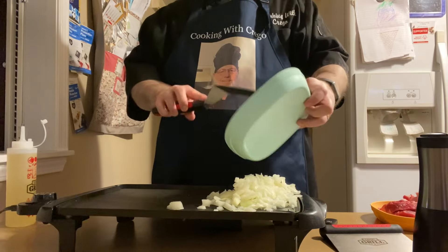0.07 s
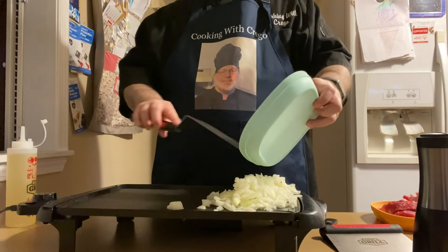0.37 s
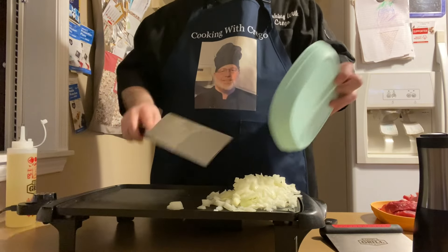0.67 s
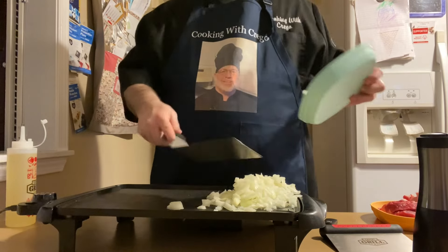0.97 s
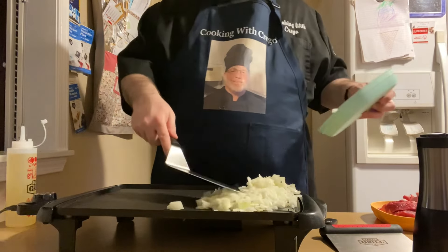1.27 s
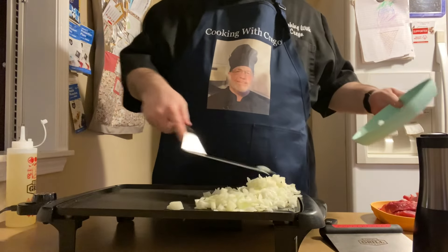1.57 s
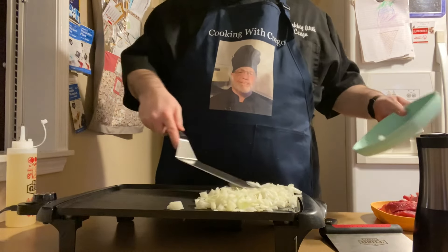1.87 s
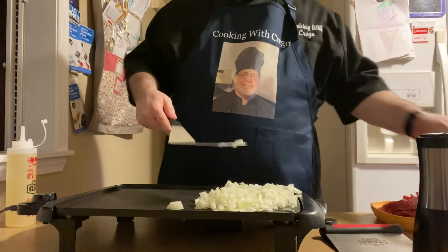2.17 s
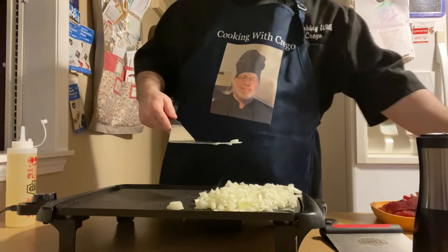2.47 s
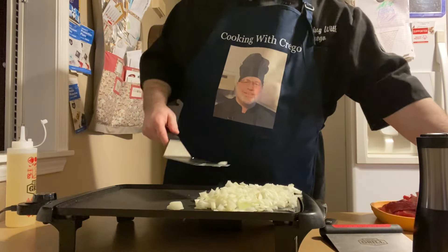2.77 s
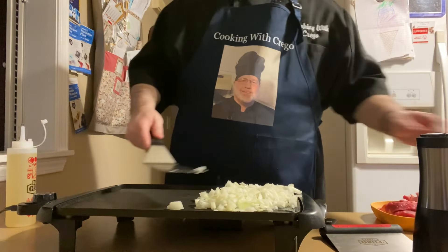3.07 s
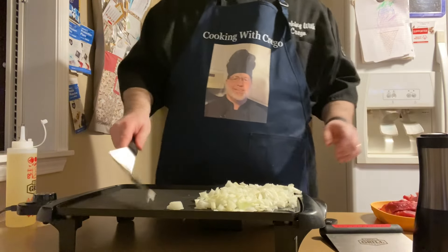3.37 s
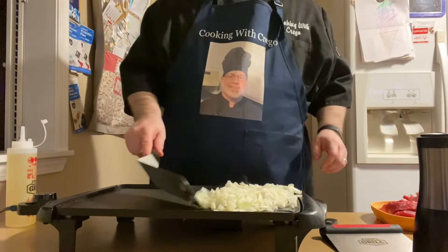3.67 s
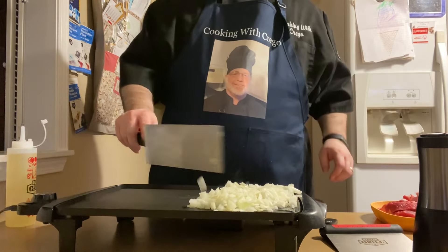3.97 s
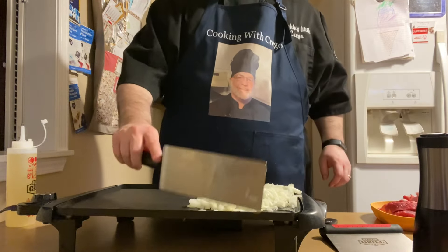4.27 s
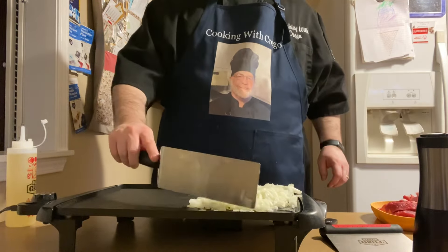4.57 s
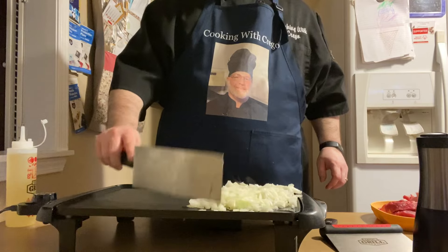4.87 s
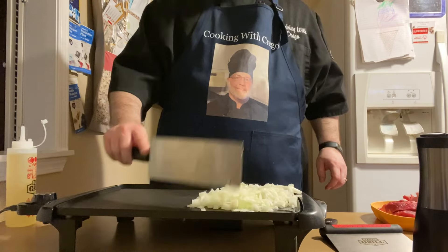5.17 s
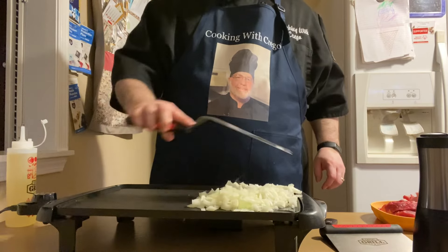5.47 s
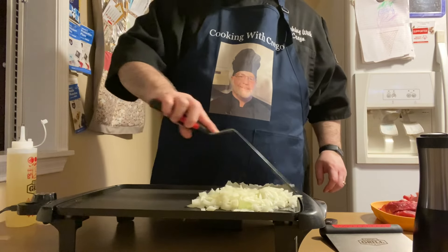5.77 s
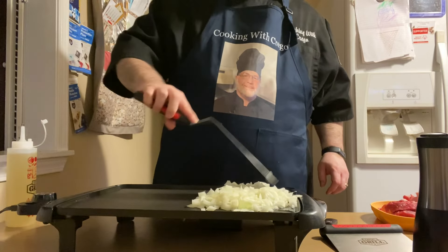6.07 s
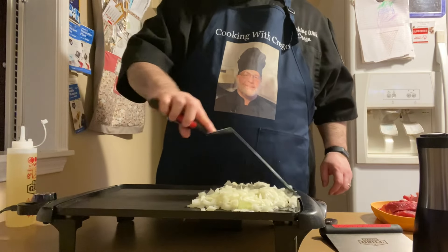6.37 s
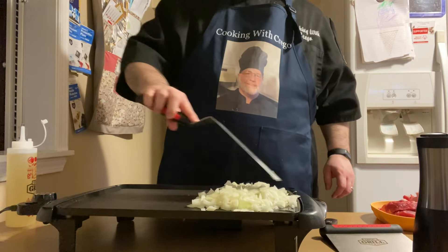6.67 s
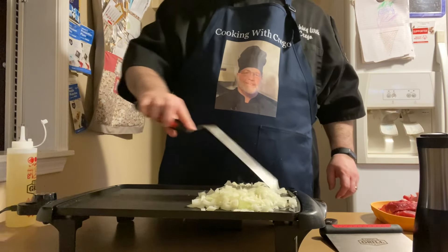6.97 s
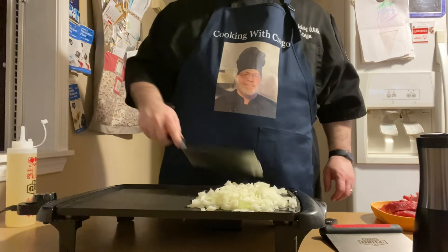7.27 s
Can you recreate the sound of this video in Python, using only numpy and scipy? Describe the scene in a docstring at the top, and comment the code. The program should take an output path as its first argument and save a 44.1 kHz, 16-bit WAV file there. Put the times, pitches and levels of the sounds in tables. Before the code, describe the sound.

In a small kitchen, heard from nearby, a steel spatula scuffs and bumps a plastic bowl and leaves a light ringing note. Wet onions crackle as they are shoved across a hot griddle, and the bowl knocks and rocks to rest. Short scrapes, sharp chops and three ringing taps of the blade follow. An even sizzle with occasional spits and a low appliance hum continue throughout.

```python
"""Onions on a griddle

Chopped onions sizzle on an electric griddle as steam bubbles burst, over a small kitchen's appliance hum.
A steel spatula wipes out a plastic bowl by stick-slip friction; the bowl is put down to the right.
The blade shoves wet onion, then knocks, scrapes and chops on the plate. Each contact excites
the normal modes of the bodies that meet, and the blade rings in free vibration as it lifts."""
import sys
import numpy as np
from scipy import signal
from scipy.fft import rfft, irfft
from scipy.io import wavfile
from scipy.ndimage import uniform_filter1d

SR = 44100
rng = np.random.default_rng(int(sys.argv[2]) if len(sys.argv) > 2 else 0)


def wrap_up_sound(samples):
    """Save the sound to the file named by the first command line argument, as 16-bit audio."""
    columns = np.atleast_2d(samples).T
    # keep every value between -1 and 1, then stretch to whole-number steps
    tamed = np.clip(columns, -1, 1)
    steps = np.round(tamed * 32767).astype(np.int16)
    wavfile.write(sys.argv[1], SR, steps)


N = 326781
TIME = np.arange(N) / SR
RING_TIME = TIME[:SR]

# reverberation of the kitchen: (frequency [Hz], t60 [s])
KITCHEN_DECAY = [(100, 0.6), (300, 0.49), (1000, 0.38), (2500, 0.39), (5000, 0.24), (9000, 0.22),
                 (15000, 0.013)]
# excess of the right microphone over the left: (frequency [Hz], gain [dB])
RIGHT_EXCESS = [(120, -1), (250, -0.5), (550, 4), (1300, 1.5), (4000, 1), (9000, 0.5)]
# tones of the appliances: (frequency [Hz], level [dB])
HUM_TONES = [(119.5, -60.5), (235, -61), (779, -70)]
# sizzle reflected by the walls, relative to the direct sound: (frequency [Hz], gain [dB])
SIZZLE_WASH = [(3500, 10.5), (7500, 10), (12000, 1)]
# spectral envelope of each source: (frequency [Hz], gain [dB])
HUM_COLOUR = [(25, -26), (54, 6.5), (91, -7), (107, 3), (135, 7), (147, -13), (161, 1), (184, 4.5),
              (240, -0.5), (260, -9), (317, 0.5), (512, -14.5), (1320, -102)]
SIZZLE_COLOUR = [(200, -11), (600, -5.5), (1200, -6.5), (2500, -4), (4500, -1.3), (7200, .5), (9200, 0),
                 (10500, -3.5), (12300, 1), (13600, -1.5), (14400, -6), (15300, -24)]
POP_COLOUR = [(200, -28), (1200, -6), (3000, -5), (7000, 4), (15000, -24.5)]
SHOVE_COLOUR = [(300, -4), (1400, 6.5), (3000, 6), (7000, 12), (14000, -11)]
WIPE_COLOUR = [(150, -3), (500, 0.5), (900, 9.5), (1400, -3), (2000, 0), (8500, -7), (14000, -48)]
SCRAPE_COLOUR = [(60, -5), (250, -5.5), (1200, 2), (2300, -4), (3400, -2), (4300, 4.5), (5500, -4),
                 (8700, -1), (14000, -58)]
KNOCK_COLOUR = [(35, -5), (130, -14), (330, 0.5), (1200, 0.5), (2100, -3), (3600, -12.5), (6500, -21),
                (13000, -46.5)]
TAP_COLOUR = [(35, 0.5), (130, 3), (330, -2.5), (1200, 0.5), (2300, -4.5), (3600, -5.5), (6500, -2),
              (13000, -13)]
CHOP_COLOUR = [(35, 7), (130, 1.5), (330, 2.5), (1200, -1.5), (2100, -6), (3600, -11), (6200, -21.5),
               (9000, -35), (13000, -62)]
# normal modes: (frequency [Hz], relative level [dB])
BOWL_MODES = [(140, -1.5), (285, 6), (412, -0.5), (490, 6), (741, 9.5), (785, 3), (960, 7), (1092, 4),
              (1182, 2), (1285, 1), (1378, -2.5), (1545, -6), (2000, 5), (2200, -9.5), (3135, -3)]
PLATE_MODES = [(137, 4), (190, -3), (283, 0.5), (366, 9.5), (497, 6), (546, 6.5), (834, 11.5), (1034, 5),
               (1310, 8), (1421, 4.5)]
TIP_MODES = [(901, 9), (1915, 2.3), (2153, 2.5), (2279, 2), (2993, 7.4), (3881, 1), (4944, 2.5)]  # blade resting on its tip
EDGE_MODES = [(930, 10), (1130, -2), (1580, 10), (2010, 9), (2347, -1), (2702, 2), (3240, 6), (3773, -6),
              (4923, -1), (5299, -8)]  # blade resting on its edge
SWAY_MODES = [(485, -8), (875, 2.5)]  # whole blade swaying on its neck
BLADE_OVERTONES = [(3342, 2), (4323, -3), (4618, 1), (5996, 1), (6982, 0), (7703, -2), (8155, 1), (8648, 2),
                   (9180, 0), (9450, 0), (10887, -3), (12483, -1), (12790, -2)]
# low modes of the blade, two bends with a twist between them: (frequency [Hz])
BENDS_AND_TWIST_HZ = [1612, 1971, 2563]
# the blade's long note: (lowest bend [dB], highest bend [dB])
SING_DB = [-39, -45.5]
# onion snaps and spits of oil: (time [s], relative level [dB])
POPS = [(0.9672, -20.5), (2.076, -24), (3.075, -29), (3.226, -28), (3.364, -23), (4.2855, -19),
        (4.668, -16.5), (4.8557, -17.5), (5.1509, -10)]
# the blade shoves wet onion: (start [s], fade time [s], level [dB])
SHOVES = [(1.078, 0.53, -40.5), (1.614, 0.39, -40)]
# strokes of the edge:
# (start [s], length [s], relative level [dB], hardness [dB/octave], first rasp [Hz], last rasp [Hz])
BOWL_WIPES = [(0, 0.069, -29.5, -1, 270, 241), (.128, 0.062, -20.5, 4, 1240, 910)]
PLATE_SCRAPES = [(3.48, 0.12, -33.5, -1.2, 4400, 4270), (3.527, .025, -30, 1.7, 3330, 3300),
                 (3.576, 0.062, -22, -2, 3500, 3020), (4.415, 0.027, -36.5, -0.51, 900, 1700)]
# the blade rings, briefly while pressed down and longer once it springs off: (time [s], swell [s], t60 [s],
# bend and twist level [dB], favoured low mode [Hz], overtone level [dB], low favoured overtone [Hz], high
# favoured overtone [Hz])
BLADE_RINGS = [(0.318, 0.0079, 0.27, -39.5, 1600, -43, 7850, 12700),
               (0.347, 0.015, 0.47, -40.5, 1840, -49, 3338, 7840),
               (4.292, 0.0013, 0.092, -27.5, 1650, -39, 3338, 4270),
               (4.429, 0.016, 0.48, -46.5, 2563, -52.5, 3338, 5800),
               (4.44, 0.011, 0.22, -38.5, 1690, -47.5, 4350, 8060),
               (4.913, 0.00044, 0.33, -32, 1470, -42.5, 6900, 7100),
               (5.711, 0.014, 0.31, -36.5, 2563, -41, 4618, 8750),
               (5.744, 0.03, 0.25, -28, 1560, -35.5, 4240, 8648),
               (6.36, 0.03, 0.39, -39.5, 2230, -47, 6940, 8200),
               (6.812, 0.016, 0.28, -32.5, 1790, -30.5, 5996, 12500)]
# impacts: (time [s], strength [dB], hardness [dB/octave], t60 at 1 kHz [s],
#           low favoured frequency [Hz], high favoured frequency [Hz])
BOWL_KNOCKS = [(.203, 8.3, 3, 0.2, 760, 1400), (.318, 1.7, -2, 0.19, 487, 1170),
               (.346, 1.7, 5, 0.19, 487, 1182), (2.5055, 22.7, -1, 0.17, 400, 730),
               (2.729, 23.3, 4, 0.23, 503, 1100), (2.757, 15, -1, 0.45, 285, 710),
               (2.812, 15.5, 0, 0.12, 490, 1010), (2.842, 9.2, 2.5, 0.25, 725, 1260)]  # the blade hits the rim; later the bowl is put down and rocks to rest
TIP_TAPS = [(5.708, 16.7, -1.6, 0.11, 846, 1300), (6.360, 7.2, 1, 0.16, 366, 920),
            (6.810, 15.3, 0.69, 0.16, 880, 13100)]  # the tip on the plate
# chops of the blade's edge on the plate, and a last soft, low bump of the griddle; same columns
CHOPS_AND_BUMP = [(3.4195, 14, 1.5, 0.14, 280, 1040), (3.654, 6.5, -1.5, 0.11, 280, 310),
                  (4.2915, 18, 2, 0.12, 370, 1710), (4.915, 19.5, 6.5, 0.082, 2500, 4700),
                  (7.352, -8.5, -6, 0.088, 137, 180)]

MIC_TRANSIT_S = 0.00097  # travel time between the two microphones
GRIDDLE_LEAD_S, BOWL_LEAD_S = -.00009, -.00027  # negative: the right microphone is reached first


def amp(db):
    """Amplitude ratio of a level in decibels."""
    return 10 ** (np.asarray(db) / 20)


def unit(x):
    """Normalisation to rms 1."""
    return x / np.sqrt(np.mean(x ** 2) + 1e-20)


def burst(x):
    """Normalisation to a mean energy of 1 per channel."""
    return unit(x) / np.sqrt(x.shape[1])


def curve_at(points, hz):
    """Interpolation on a logarithmic frequency axis."""
    point_hz, value = np.transpose(points)
    return np.interp(np.log(hz + 1), np.log(point_hz + 1), value)


def add(mix, start_s, sound):
    """Superposition of a stereo sound on the mix."""
    part = mix[:, max(round(start_s * SR), 0):][:, :sound.shape[1]]
    part += sound[:, :part.shape[1]]


def colour(x, points, size=4096):
    """Minimum-phase filtering by a (frequency [Hz], gain [dB]) curve."""
    log_gain = np.log(amp(curve_at(points, abs(np.fft.fftfreq(size, 1 / SR)))))
    response = np.fft.ifft(np.exp(np.conj(signal.hilbert(log_gain)))).real
    return signal.fftconvolve(x, response[None, :size // 2], axes=1)[:, :x.shape[1]]


def decay(t60):
    """One second of exponential damping, by 60 dB every t60 seconds."""
    return np.exp(-np.log(1000) * RING_TIME / np.maximum(t60, 1e-3))


def coherence(hz):
    """Spatial coherence: a diffuse field is alike at two points only at long wavelengths."""
    return np.sinc(2 * hz * MIC_TRANSIT_S)


def diffuse(n):
    """Diffuse field: stereo white noise arriving from all sides."""
    left, independent = rfft(rng.standard_normal((2, n)))
    shared = coherence(np.fft.rfftfreq(n, 1 / SR))
    right = shared * left + np.sqrt(1 - shared ** 2) * independent
    return irfft(np.array([left, right]), n)


def direct(x, lead_s):
    """Direct field: a wavefront reaches the nearer microphone first."""
    return np.array([np.pad(x, (max(round(delay * SR), 0), 0))[:len(x)] for delay in (-lead_s, lead_s)])


def kitchen_tail(build_s=0.00033):
    """Reverberation: reflections build up, then each band is absorbed at its own rate."""
    hz, t, bands = signal.stft(diffuse(SR), SR, nperseg=256)
    bands = bands * np.exp(-np.log(1000) * t / curve_at(KITCHEN_DECAY, hz)[:, None])
    tail = signal.istft(bands, SR, nperseg=256)[1][:, :SR]
    return burst(tail * (1 - np.exp(-RING_TIME / build_s)))


def in_kitchen(x, room_db):
    """Direct plus reverberant field of a source at the griddle."""
    reflections = signal.fftconvolve(x[None], kitchen_tail(), axes=1)[:, :len(x)]
    return direct(x, GRIDDLE_LEAD_S) + amp(room_db) * reflections


def crackle(per_s, spread_db):
    """Shot noise: independent impulses of random size and sign."""
    size = amp(spread_db * np.minimum(rng.exponential(1, N), 5)) * rng.choice([-1, 1], N)
    return unit(size * (rng.random(N) < per_s / SR))


def tilted(spectrum, hardness, hinge_hz=1080, bass_share=0.28):
    """Spectral tilt: a harder contact gives more treble and slightly less bass."""
    octaves = [np.log2(hz / hinge_hz) for hz, _ in spectrum]
    return [(hz, db + hardness * max(up, bass_share * up)) for (hz, db), up in zip(spectrum, octaves)]


def favoured(hz, spots_hz, octaves=0.23):
    """Modal coupling: the struck spot drives frequencies near spots_hz most strongly."""
    return sum(np.exp(-(np.log2(hz / spot) / octaves) ** 2) for spot in spots_hz)


def through_body(x, modes, peak_db=5, spots_hz=(), spot_db=0):
    """Resonance: contact noise gathers at a body's modes, leaving valleys between them."""
    hz = np.fft.rfftfreq(4096, 1 / SR)[1:]
    # each peak's width is 24 Hz plus 2.2 % of its frequency
    peaks = np.max([np.exp(-((hz - f) / (24 + .022 * f)) ** 2) for f, _ in modes], axis=0)
    power = amp(peak_db * peaks) ** 2
    db = 10 * np.log10(power / uniform_filter1d(power, size=96)) + spot_db * favoured(hz, spots_hz)
    return colour(x, np.column_stack([hz, db]))


def ring(modes, t60, spots_hz=(), favour_db=0, damping=0.4):
    """Normal modes decay as damped sines; t60 holds at 1 kHz, and damping shortens the higher ones."""
    out = np.zeros((2, SR))
    for hz, db in modes:
        apart = np.arccos(coherence(hz)) * rng.choice([-.5, .5])
        phase = np.array([[apart], [-apart]]) + rng.uniform(0, 2 * np.pi)
        envelope = amp(db + favour_db * favoured(hz, spots_hz)) * decay(t60 * (1000 / hz) ** damping)
        out += envelope * np.sin(2 * np.pi * hz * RING_TIME + phase)
    return out


def hum(rumble_db=-49, waver=0.441):
    """Broadband fan rumble, with motor tones whose phase wavers in a random walk."""
    out = amp(rumble_db) * unit(colour(diffuse(N), HUM_COLOUR, size=16384))
    knots = np.linspace(0, TIME[-1], num=40)
    for hz, db in HUM_TONES:
        drift = np.interp(TIME, knots, np.cumsum(rng.standard_normal(len(knots))))
        out += amp(db) * np.sqrt(2) * np.sin(2 * np.pi * hz * TIME + waver * np.pi * drift)
    return out


def sizzle(level_db=-43.5):
    """Shot noise of bursting steam bubbles, with a diffuse wash from the walls."""
    bubbles = direct(crackle(per_s=9000, spread_db=5.5), GRIDDLE_LEAD_S)
    wash = colour(diffuse(N), SIZZLE_WASH)
    return amp(level_db) * unit(colour(bubbles + wash, SIZZLE_COLOUR))


def pops(gain_db=15, room_db=-7, t60=.006):
    """Impulsive sources: snapping onion and spitting oil send out brief pressure pulses."""
    out = np.zeros((2, N))
    for start, db in POPS:
        snap = rng.standard_normal(SR) * decay(t60)
        snap[0] = 4  # sharp wavefront
        pop = burst(direct(snap, GRIDDLE_LEAD_S)) + amp(room_db) * kitchen_tail()
        add(out, start, amp(db + gain_db) * pop)
    return colour(out, POP_COLOUR)


def shoves(attack_s=0.042, fade_db=-16):
    """Modulated shot noise: wet crackle flares with each shove of the pile and dies away."""
    wet = unit(colour(in_kitchen(crackle(per_s=1500, spread_db=7.5), room_db=1), SHOVE_COLOUR))
    envelope = np.zeros(N)
    for start, fade_s, db in SHOVES:
        age = np.maximum(TIME - start, 0)
        envelope += np.minimum(age / attack_s, 1) * amp(db + fade_db * age / fade_s)
    return wet * envelope


def rasp(slips, hz, width_hz):
    """A gliding resonance: a band-pass filter follows the moving point of contact."""
    carrier = np.exp(2j * np.pi * np.cumsum(hz) / SR)
    pole = np.exp(-np.pi * width_hz / SR)
    return (carrier * signal.lfilter([1 - pole], [1, -pole], slips / carrier)).real


def strokes(rows, spectrum, modes, slips_per_s, press_db, release_t60, rasp_db, width_hz,
            body_db, room_db, grip_s=.015):
    """Stick-slip friction: the edge, pressed ever harder until it lets go, drives the body's modes."""
    out = np.zeros((2, N))
    for start, length, db, hardness, from_hz, to_hz in rows:
        travel = np.minimum(RING_TIME / length, 1)
        release_db = -60 * np.maximum(RING_TIME - length, 0) / release_t60
        pressure = np.minimum(RING_TIME / grip_s, 1) * amp(db - press_db * (1.5 - travel) + release_db)
        impulses = crackle(slips_per_s, spread_db=-1)[None, :SR]
        slips = through_body(colour(impulses, tilted(spectrum, hardness)), modes)[0]
        glide = rasp(slips, from_hz + (to_hz - from_hz) * travel, width_hz)
        body = signal.fftconvolve(slips[None], ring(modes, t60=0.24), axes=1)[:, :SR]
        contact = in_kitchen(pressure * (unit(slips) + amp(rasp_db) * unit(glide)), room_db)
        add(out, start, (contact + amp(body_db) * pressure * unit(body)) / 2)
    return out


def lifted(x, swell_s, flutter_db=1.4, flutter_rad=.3):
    """Amplitude and phase modulation: the steel's ring swells as it lifts and flutters as it turns."""
    knots = np.linspace(0, 1, num=30)
    wander = [np.interp(RING_TIME, knots, row) for row in rng.standard_normal((4, len(knots)))]
    level, phase = np.reshape(wander, (2, 2, SR))
    analytic = signal.hilbert(x * (1 - np.exp(-(RING_TIME / swell_s) ** 2)))
    return (analytic * amp(flutter_db * level) * np.exp(1j * flutter_rad * phase)).real


def blade_rings():
    """Free vibration: after contact the blade sways, bends, twists and rings in its overtones."""
    out = np.zeros((2, N))
    for start, swell_s, t60, bends_db, bend_hz, overtones_db, *spots_hz in BLADE_RINGS:
        bends = ring([(hz, bends_db) for hz in BENDS_AND_TWIST_HZ], t60, [bend_hz], favour_db=13, damping=0)
        overtones = amp(overtones_db) * ring(BLADE_OVERTONES, t60, spots_hz, favour_db=11)
        sway = amp(bends_db) * ring(SWAY_MODES, t60=0.21)
        add(out, start, lifted(sway + bends + overtones, swell_s))
    return out


def blade_note(start_s=0.49, length_s=0.52, fade_s=0.23):
    """Light damping: clear of the bowl, two bending modes sing on until the onions stop them."""
    out = np.zeros((2, N))
    note = ring(zip(BENDS_AND_TWIST_HZ[::2], SING_DB), t60=4.5, damping=0)
    fade = np.clip((length_s - RING_TIME) / fade_s, 0, 1)
    add(out, start_s, lifted(note, swell_s=0.065) * fade)
    return out


def impacts(rows, spectrum, modes, lead_s, modes_db, room_db, crack_db, crack_t60, clatter_share,
            rise_s, favour_db, spot_db, peak_db):
    """Impact excitation: the body filters a crack, a clatter and their reverberation, and rings on."""
    out = np.zeros((2, N))
    for start, db, hardness, t60, *spots_hz in rows:
        crack = burst(direct(rng.standard_normal(SR) * decay(crack_t60), lead_s))
        clatter = burst(diffuse(SR) * decay(clatter_share * t60))
        hit = burst(amp(crack_db) * crack + clatter + amp(room_db) * kitchen_tail())
        clank = through_body(colour(hit, tilted(spectrum, hardness)), modes, peak_db, spots_hz, spot_db)
        body = ring(modes, t60, spots_hz, favour_db) * (1 - np.exp(-RING_TIME / rise_s))
        add(out, start, amp(db) * (clank + amp(modes_db) * body))
    return out


def scene():
    """Superposition of impacts, friction and ringing steel on the sizzle and the hum."""
    chops = impacts(CHOPS_AND_BUMP, CHOP_COLOUR, PLATE_MODES + EDGE_MODES, GRIDDLE_LEAD_S,
                    modes_db=-49.5, room_db=1, crack_db=-1, crack_t60=0.021, clatter_share=0.44,
                    rise_s=0.022, favour_db=12.5, spot_db=2, peak_db=3.5)
    taps = impacts(TIP_TAPS, TAP_COLOUR, PLATE_MODES + TIP_MODES + BLADE_OVERTONES, GRIDDLE_LEAD_S,
                   modes_db=-49, room_db=-1, crack_db=-9, crack_t60=0.063, clatter_share=0.99,
                   rise_s=0.0071, favour_db=3.5, spot_db=3, peak_db=5)
    knocks = impacts(BOWL_KNOCKS, KNOCK_COLOUR, BOWL_MODES, BOWL_LEAD_S,
                     modes_db=-53.5, room_db=-1, crack_db=1, crack_t60=0.091, clatter_share=1.4,
                     rise_s=0.0066, favour_db=8.5, spot_db=3.5, peak_db=3.5)
    wipes = strokes(BOWL_WIPES, WIPE_COLOUR, BOWL_MODES, slips_per_s=2400, press_db=11.5,
                    release_t60=0.03, rasp_db=3, width_hz=220, body_db=2, room_db=-3.5)
    scrape_modes = PLATE_MODES + EDGE_MODES[:6] + BLADE_OVERTONES[:2]
    scrapes = strokes(PLATE_SCRAPES, SCRAPE_COLOUR, scrape_modes, slips_per_s=1300, press_db=3.5,
                      release_t60=0.14, rasp_db=-5, width_hz=590, body_db=-1.5, room_db=-12)
    contacts = chops + taps + knocks + wipes + scrapes
    return contacts + blade_rings() + blade_note() + sizzle() + shoves() + pops() + hum()


def record(dry, low_cut_hz=37, high_cut_hz=15200):
    """Frequency response of the microphones: band-limited, with more midrange on the right."""
    hz = np.fft.rfftfreq(N, 1 / SR)
    side_db = curve_at(RIGHT_EXCESS, hz) / 2
    low_cut = hz ** 4 / (hz ** 4 + low_cut_hz ** 4)
    balanced = irfft(rfft(dry) * low_cut * amp([-side_db, side_db]), N)
    high_cut = signal.firwin(255, high_cut_hz, window=("kaiser", 9), fs=SR)
    return signal.oaconvolve(balanced, high_cut[None], "same")


dry = scene()
out = record(dry)
wrap_up_sound(out)
```